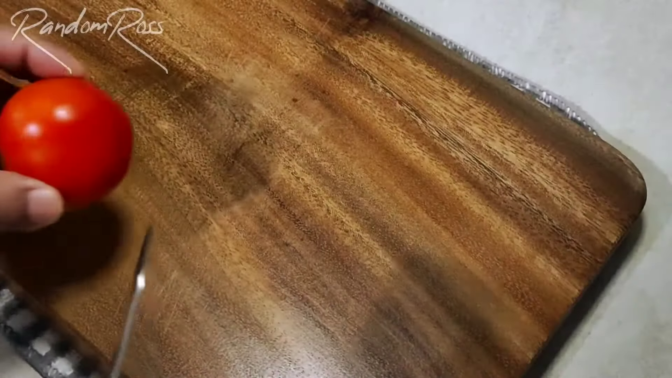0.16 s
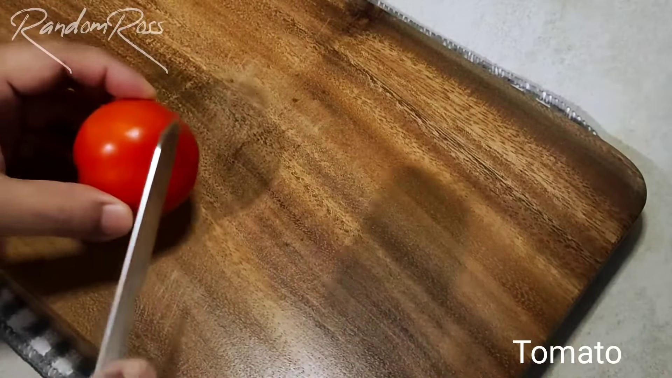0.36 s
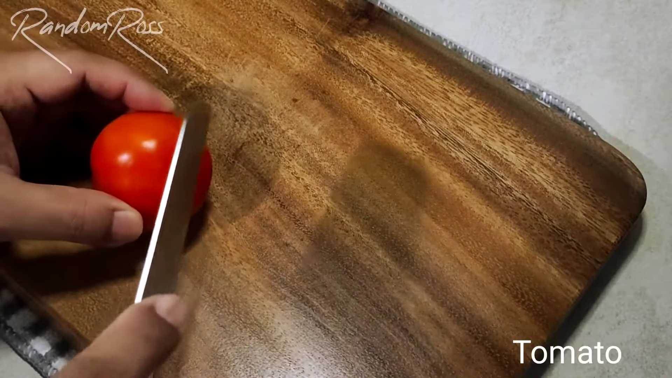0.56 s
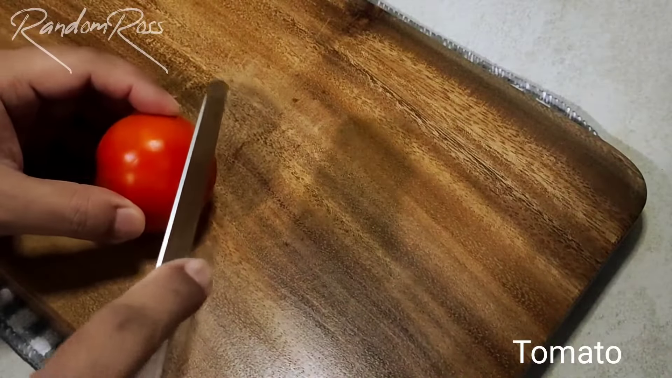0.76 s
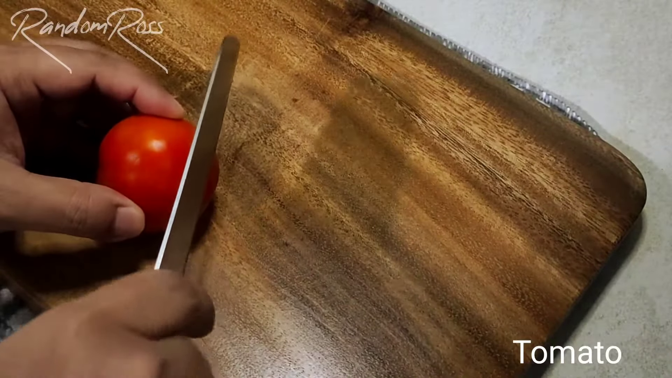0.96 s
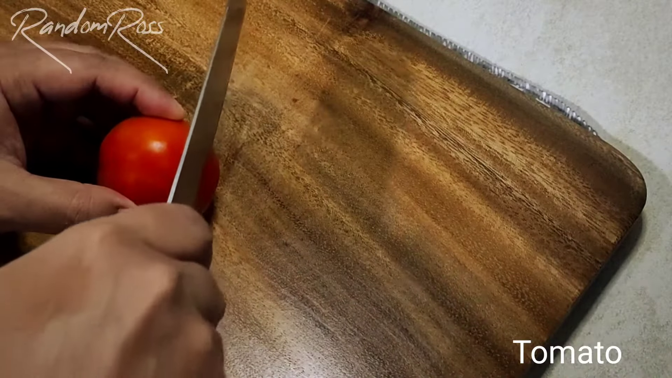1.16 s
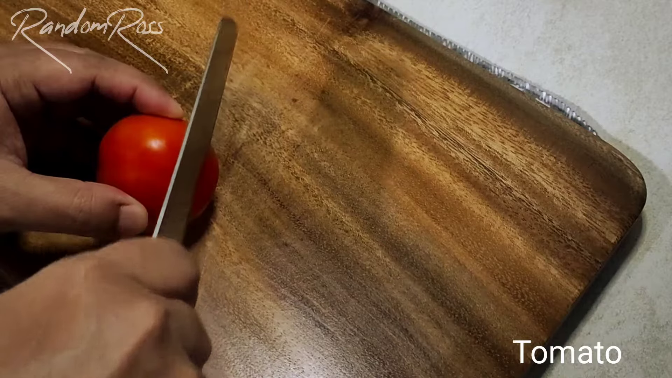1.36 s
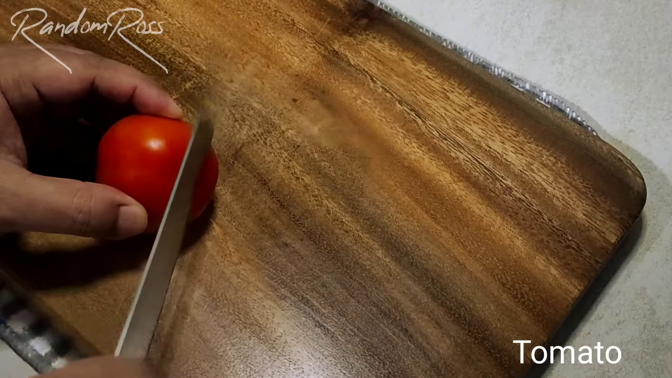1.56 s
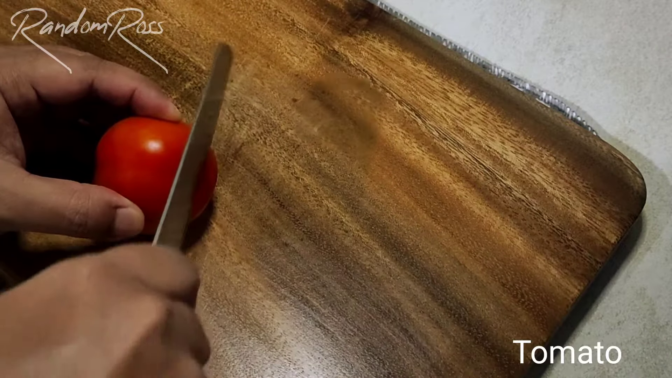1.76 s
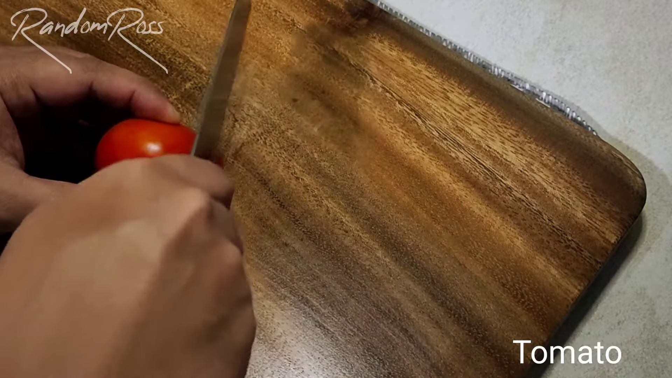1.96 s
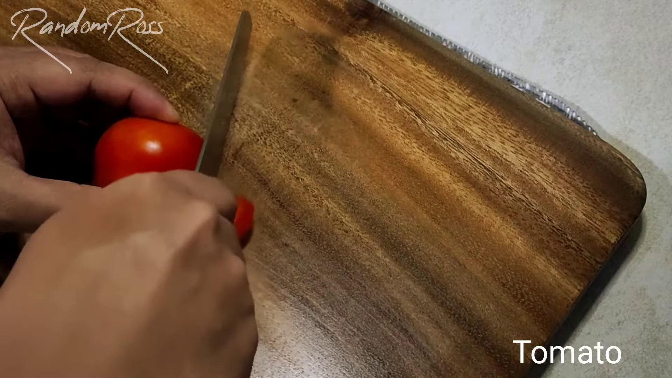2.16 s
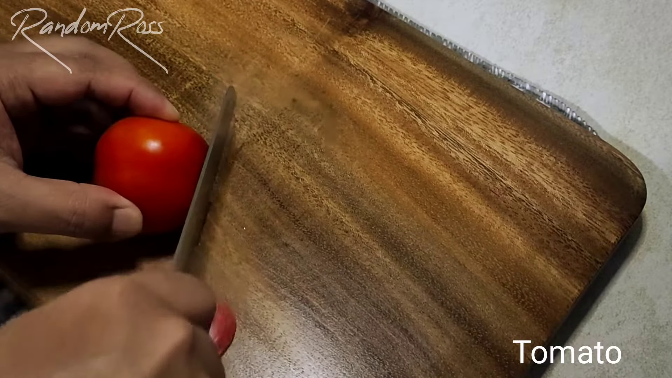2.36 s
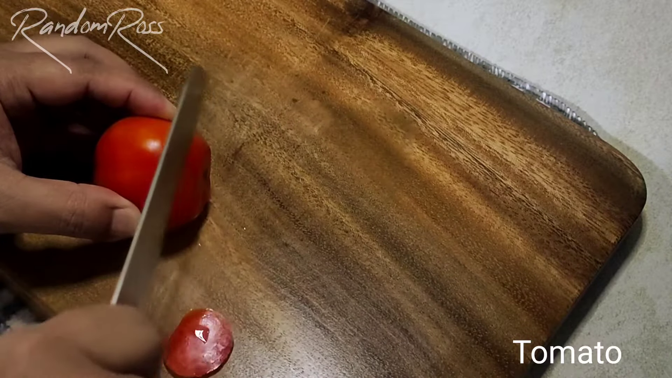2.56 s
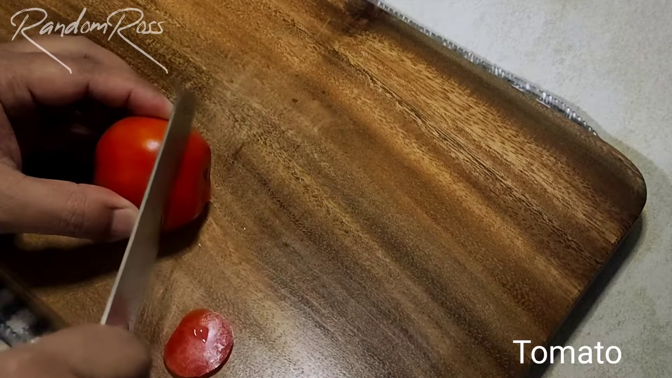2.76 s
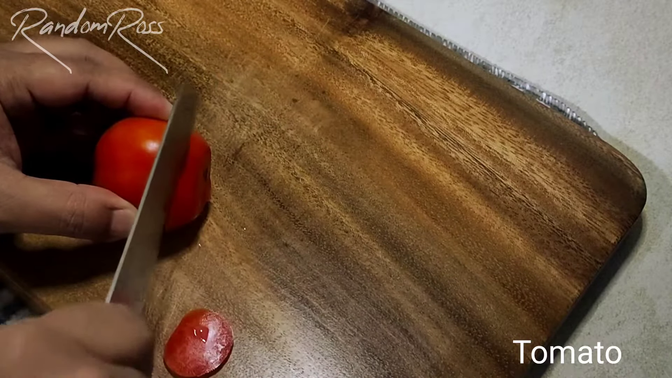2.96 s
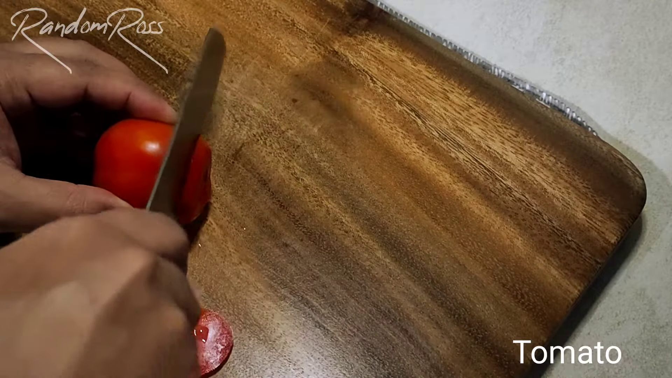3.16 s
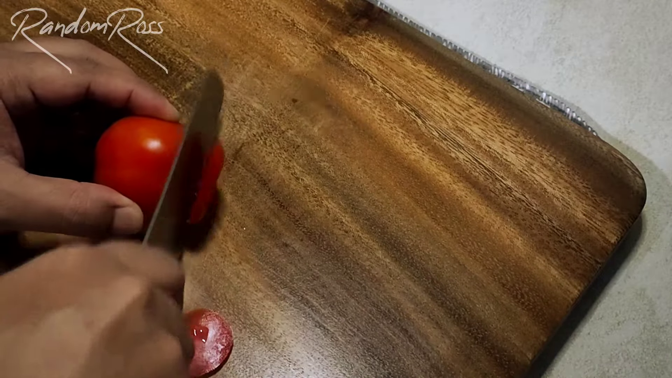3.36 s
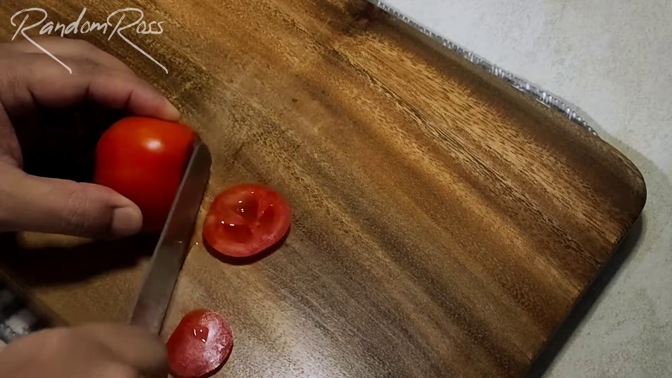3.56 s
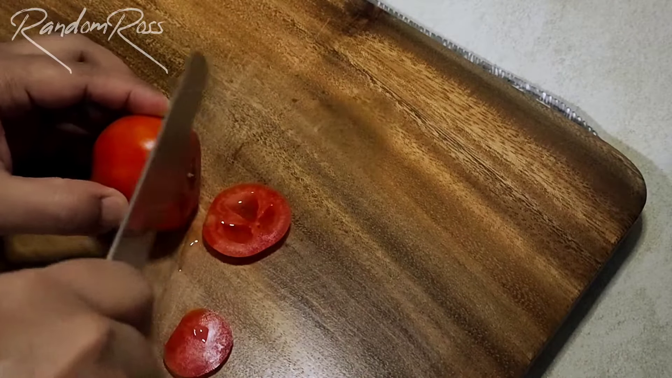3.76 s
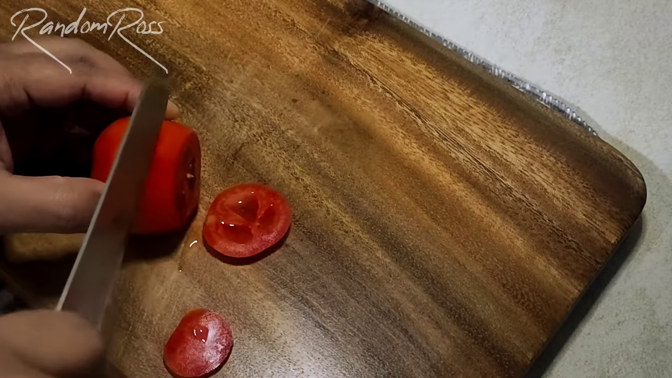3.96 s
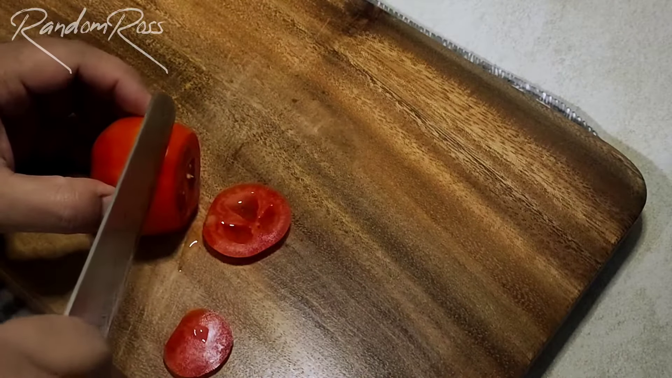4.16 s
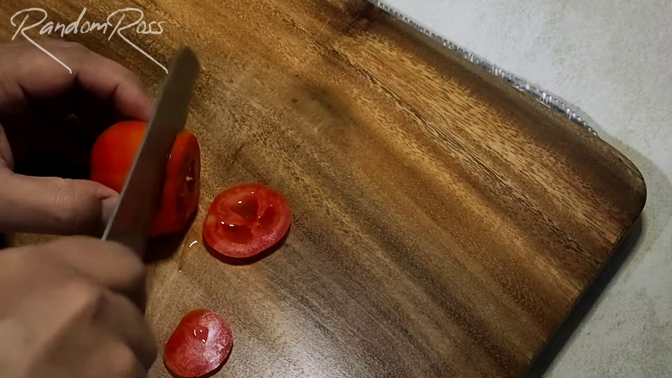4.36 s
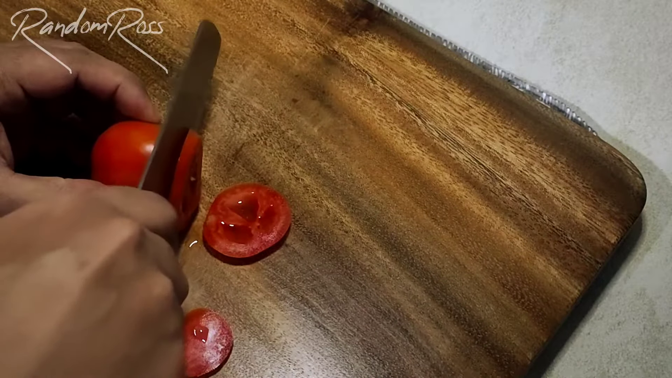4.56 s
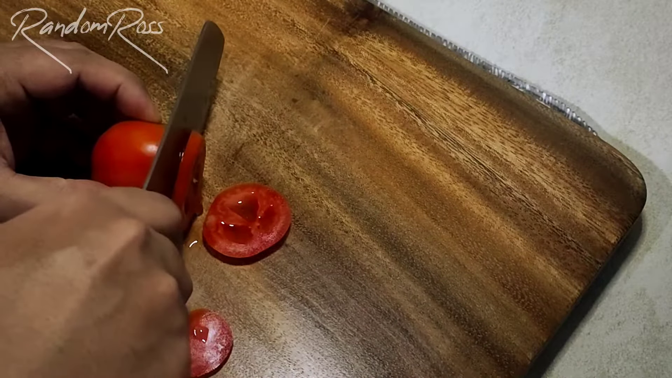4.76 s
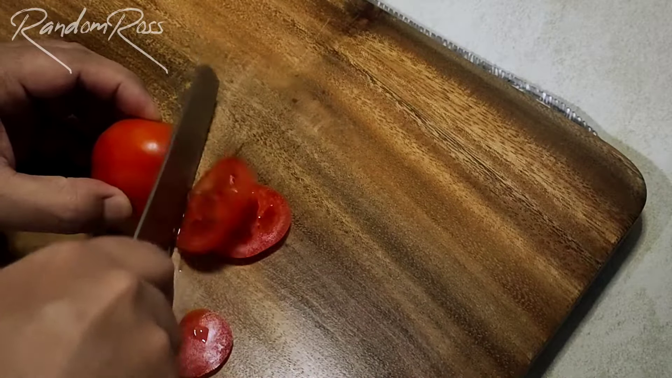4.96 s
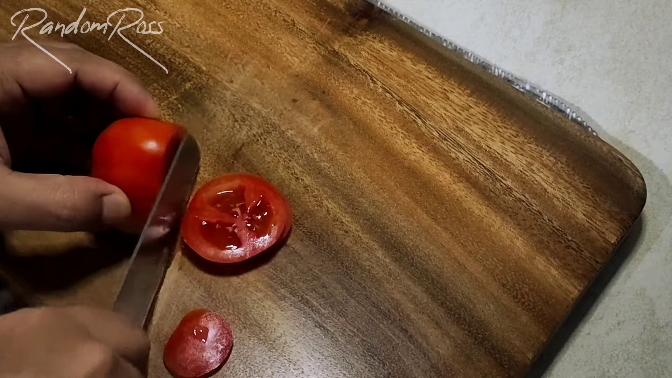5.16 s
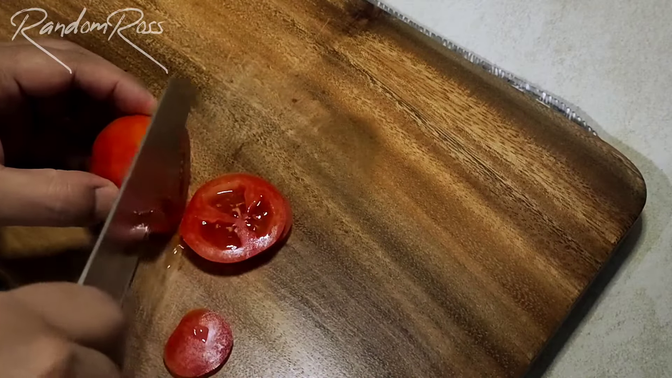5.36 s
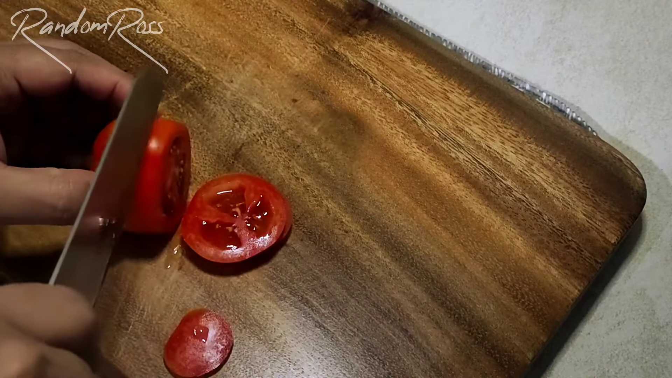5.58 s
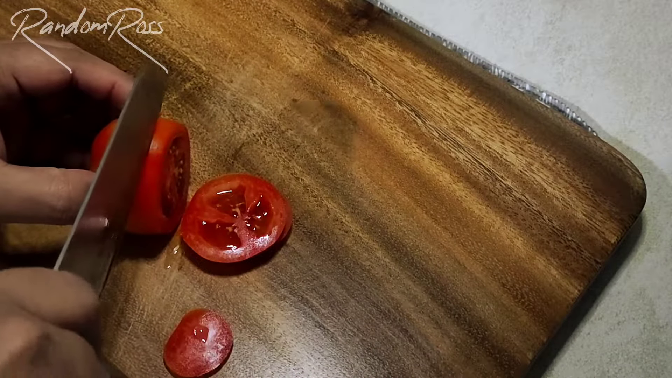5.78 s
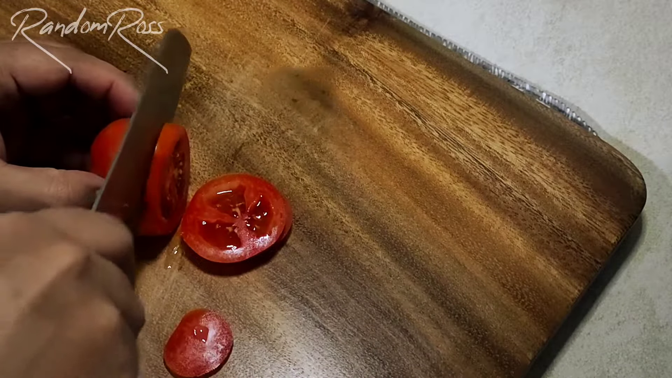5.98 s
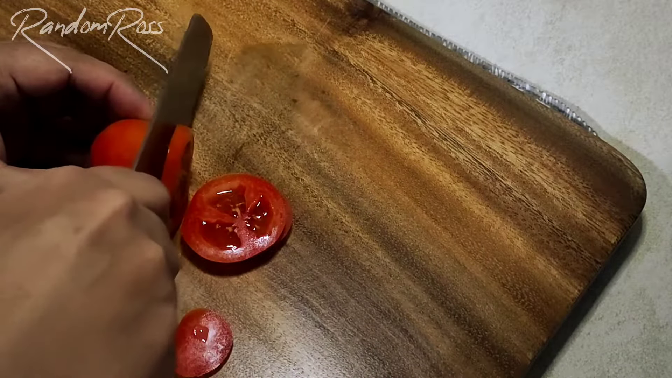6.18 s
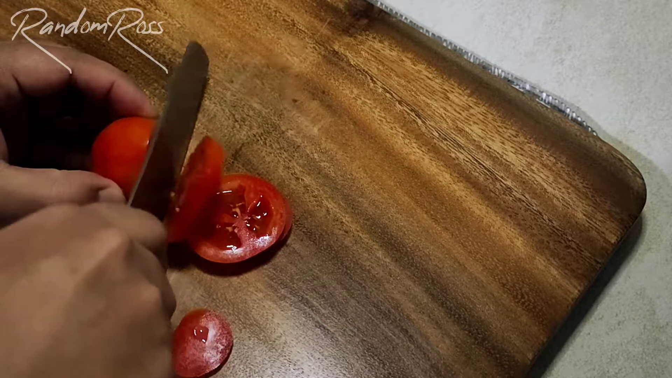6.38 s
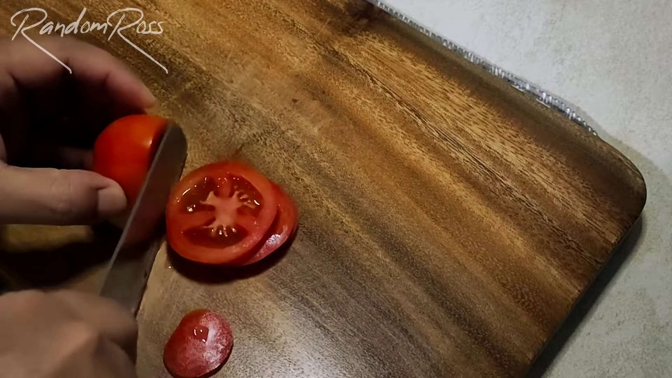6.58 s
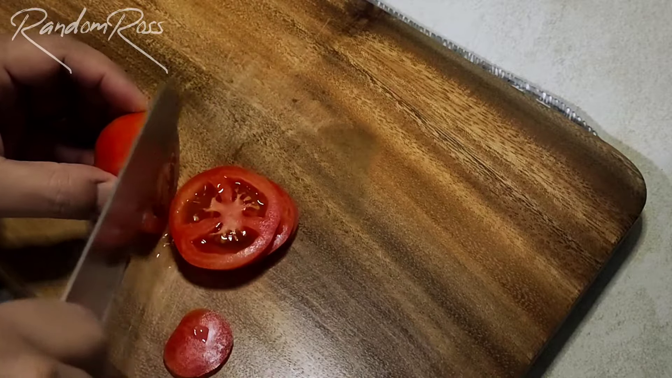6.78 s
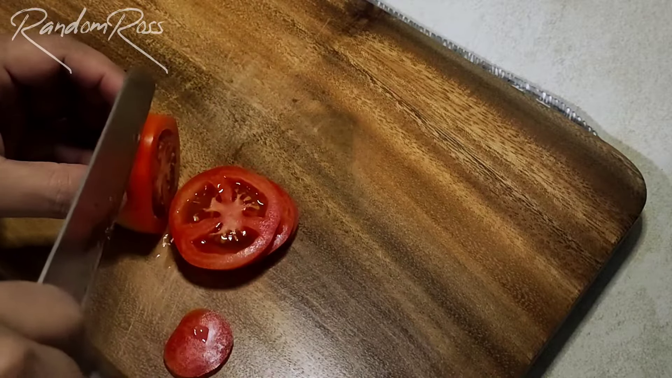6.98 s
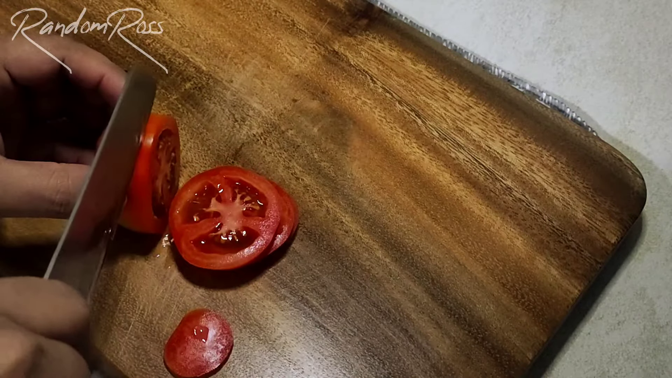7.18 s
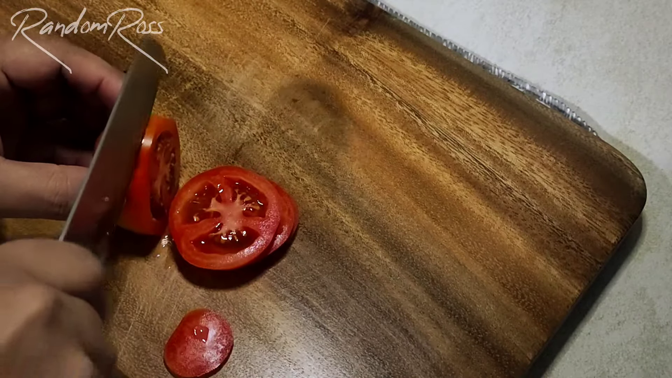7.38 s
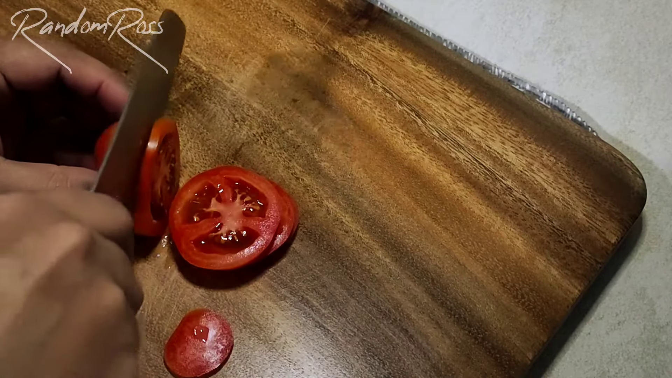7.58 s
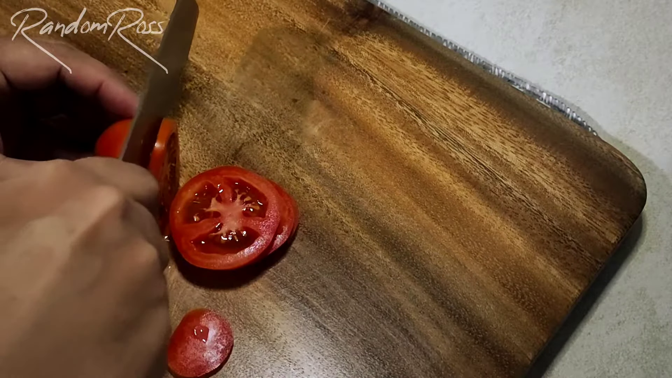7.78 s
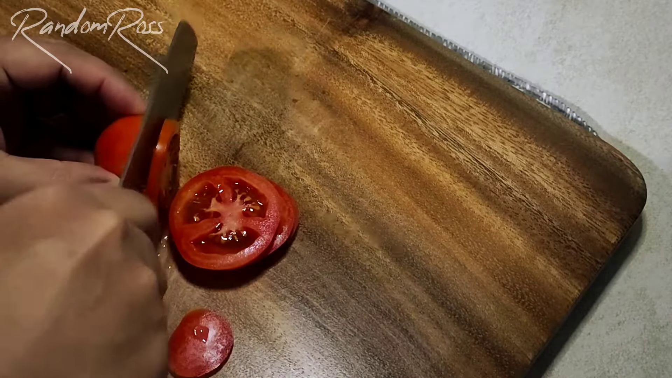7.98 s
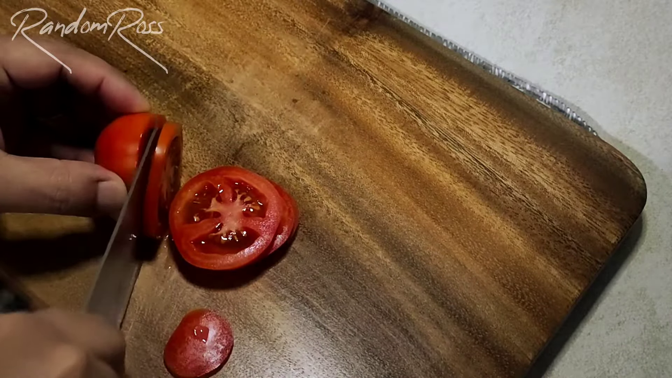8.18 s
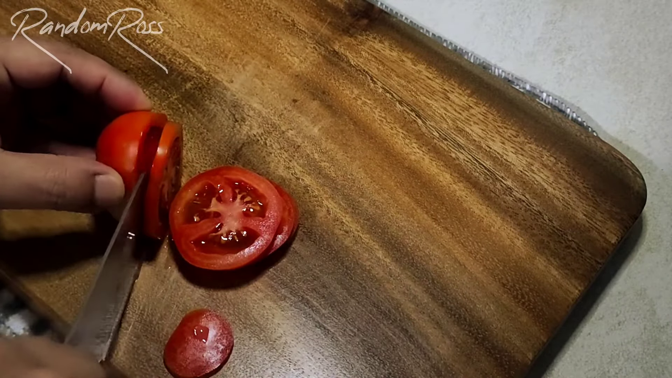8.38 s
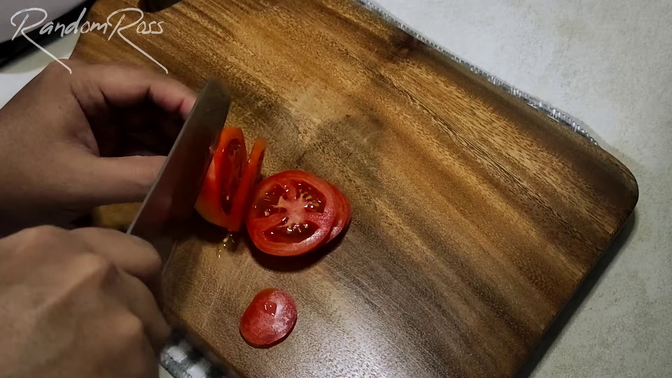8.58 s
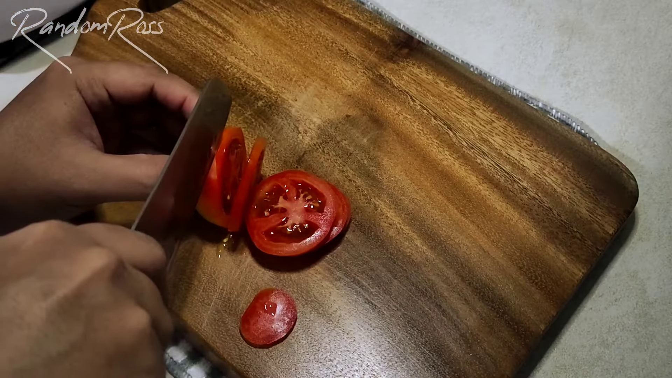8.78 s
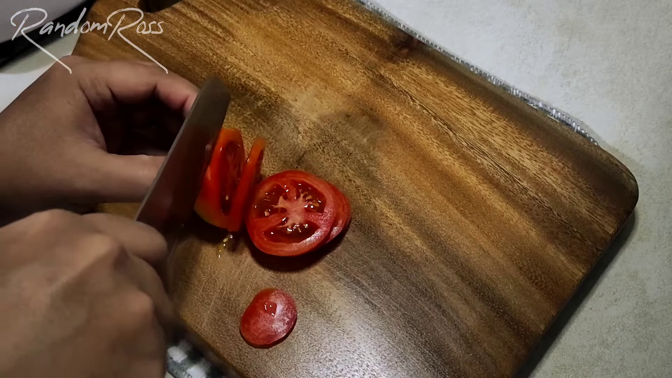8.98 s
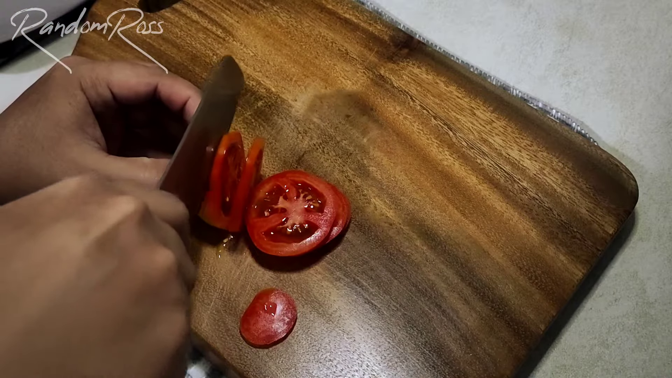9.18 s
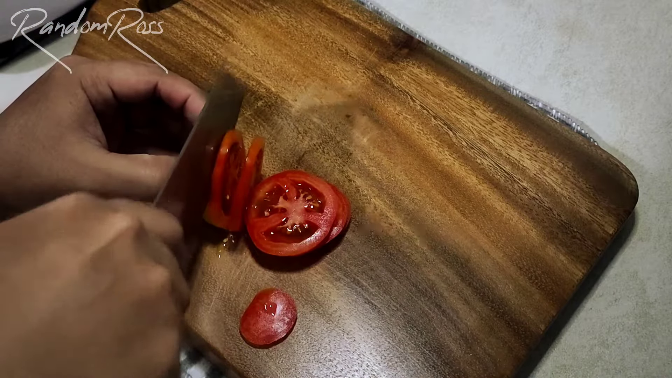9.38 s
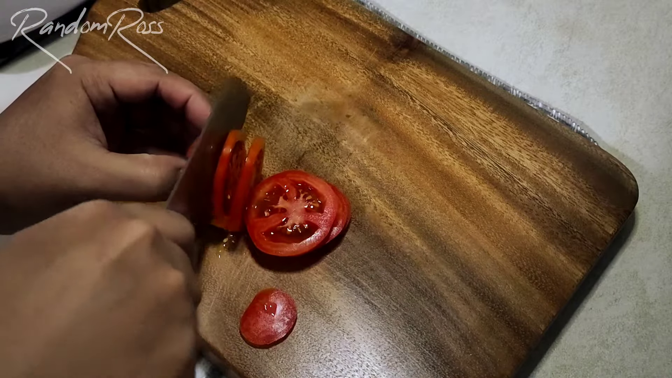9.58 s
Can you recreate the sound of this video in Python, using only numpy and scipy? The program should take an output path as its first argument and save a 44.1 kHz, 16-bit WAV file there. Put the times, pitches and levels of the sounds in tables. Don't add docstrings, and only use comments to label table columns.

```python
import sys
import numpy as np
from scipy import signal
from scipy.fft import rfft, irfft, next_fast_len
from scipy.io import wavfile

SR = 44100
rng = np.random.default_rng(int(sys.argv[2]) if len(sys.argv) > 2 else 0)


def int16_out(signal):
    q = np.round(np.clip(np.atleast_2d(signal).T, -1, 1) * 32767)
    wavfile.write(sys.argv[1], SR, q.astype(np.int16))


def gain_from_decibels(decibels):
    exponent = np.asarray(decibels, float) / 20
    return 10 ** exponent


N = 424683

# start in s, force in dB, contact softness in Hz, tip modes in dB, heel modes in dB.
KNOCK_EVENTS = [
    (2.134, -33, 1500, 10, 0),
    (2.1698, -1.5, 2460, -3, 3),
    (3.5098, -5, 2470, 15.5, -4),
    (5.0495, -10, 1600, 7, 7),
    (5.1, -37, 1500, 23.5, 2),
    (6.4345, -10.5, 620, -12, 6),
    (8.185, -29.5, 480, -10, -10),
]


def rms_one(x):
    return x / np.sqrt(np.mean(x ** 2) + 1e-20)


def at_hz(points, hz):
    table_hz, values = np.array(points).T
    return np.interp(np.log(hz + 1), np.log(table_hz), values)


def drift(rate_hz):
    r = np.exp(-2 * np.pi * rate_hz * 40 / SR)
    noise = rng.standard_normal(N // 40 + 2002)
    slow = signal.lfilter([1], [1, -2 * r, r * r], noise)[2000:]
    return np.interp(np.arange(N) / 40, np.arange(len(slow)), rms_one(slow))


def coloured(spectrum, alike, lag_samples=0.):
    # frequency in Hz, left minus right in dB.
    port_balance = [(60, 2.5), (110, 0.5), (200, 0), (380, -1.5), (700, 0.5), (1290, -1.5), (2380, 0),
                    (4400, 0.5), (8120, -7.5), (15000, 17)]
    size = next_fast_len(N)
    hz = np.fft.rfftfreq(size, 1 / SR)
    shared, opposed = rfft(rng.standard_normal((2, size)))
    alike = np.clip(at_hz(alike, hz), -1, 1)
    pair = np.sqrt(1 + alike) * shared + np.sqrt(1 - alike) * opposed * [[1], [-1]]
    pair[0] *= np.exp(-2j * np.pi * hz * lag_samples / SR)
    port_gain = gain_from_decibels(at_hz(port_balance, hz) * [[.5], [-.5]])
    return rms_one(irfft(pair * port_gain * gain_from_decibels(at_hz(spectrum, hz)), size)[:, :N])


def ringing(modes, t):
    hz, t60_s, left, right = np.transpose(modes)[:, :, None]
    waves = np.sin(2 * np.pi * hz * t) * gain_from_decibels(-60 * t / t60_s)
    return np.array([(left * waves).sum(axis=0), (right * waves).sum(axis=0)])


def resonance(push, hz, width_hz):
    r = np.exp(-np.pi * width_hz / SR)
    poles = [1, -2 * r * np.cos(2 * np.pi * hz / SR), r * r]
    return np.sqrt(1 - r * r) * signal.lfilter([1, 0, -1], poles, push)


def add(out, start_s, sound):
    i = round(start_s * SR)
    out[:, i:i + sound.shape[1]] += sound[:, :N - i]


def air():
    # time in s, level in dB.
    rumble_swell = [(0.0, -60.5), (0.56, -61), (3.57, -59), (3.94, -61), (4.4, -59.5), (5.63, -60.5),
                    (8.31, -58), (8.56, -58.5), (9.63, -54)]
    # frequency in Hz, density in dB per Hz.
    low_spectrum = [(12, -82), (20, -59), (32, -65), (43, -11), (118, 1.5), (200, -7), (221, -24.5),
                    (256, -13.5), (300, -4.5), (390, -45), (660, -120)]
    mid_spectrum = [(120, -38), (200, -11), (227, -0.5), (257, -2.5), (308, -3.5), (382, -1.5), (524, -0.5),
                    (614, -6.5), (843, -9), (1160, -11.5), (1250, -12), (1470, -12), (3000, -24),
                    (3900, -62), (6600, -120)]
    high_spectrum = [(1290, -46), (2200, -4), (3190, -0.5), (4150, 2), (4700, -3), (6540, -0.5),
                     (7160, -6.5), (9020, 2.5), (10600, -2.5), (11200, -2.5), (13300, -8), (15200, -14),
                     (15800, -10)]
    # frequency in Hz, left-right likeness of the room air.
    likeness = [(60, 1), (130, 0.93), (290, 0.82), (640, 0.36), (1410, 0), (3100, -0.0), (6820, 0.27),
                (15000, 0.68)]
    # frequency in Hz, level in dB, wander in Hz.
    whine_partials = [(1286, -74, 1.57), (1225, -81, 2.92)]
    mid_db, high_db, whine_sway_db = -62, -69.5, .8

    t = np.arange(N) / SR
    rumble_db = np.interp(t, *np.transpose(rumble_swell)) + 0.67 * drift(7.8)
    rumble = gain_from_decibels(rumble_db) * coloured(low_spectrum, likeness, lag_samples=7.5)
    mid = gain_from_decibels(mid_db + .5 * drift(3.3)) * coloured(mid_spectrum, likeness, lag_samples=6.5)
    mic_hiss = gain_from_decibels(high_db) * coloured(high_spectrum, likeness)
    whine = 0
    for hz, level_db, wander_hz in whine_partials:
        phase = 2 * np.pi * np.cumsum(hz + wander_hz * drift(3.98)) / SR
        whine = whine + gain_from_decibels(level_db + 3.5 + whine_sway_db * drift(3.3)) * np.sin(phase + [[0], [1.3]])
    return rumble + mid + mic_hiss + whine


def squeaks():
    # start in s, length in s, frequency in Hz, level in dB.
    chirps = [
        (1.135, .055, 13500, -69),
        (5.136, 0.041, 4250, -64),
        (9.492, .025, 3600, -69),
        (9.532, .014, 3000, -65),
        (9.234, 0.041, 1490, -59.5),
        (9.55, .035, 1980, -67),
        (9.58, .03, 1720, -75),
    ]
    out = np.zeros((2, N))
    for start_s, length_s, hz, level_db in chirps:
        t = np.arange(round(length_s * SR)) / SR
        swell = np.sqrt(np.sin(np.pi * t / length_s))
        add(out, start_s, gain_from_decibels(level_db) * swell * np.sin(2 * np.pi * hz * t + [[0], [1]]))
    return out


def blade_levels():
    # start in s, length in s, hiss at start in dB, hiss at end in dB,
    # drag relative to hiss in dB.
    strokes = [(1.40, 0.17, -74, -65.5, -18), (1.745, 0.36, -71, -59.5, -14),
               (2.25, 0.074, -60, -53.5, -7.5), (2.349, 0.061, -49, -51.5, -11.5),
               (3.045, 0.28, -66.5, -59.5, -9.5), (4.337, 0.33, -62.5, -61, -11.5),
               (4.65, 0.19, -62, -74, -14), (5.091, .08, -54.5, -58.5, -2.5), (5.184, 0.07, -58, -52, -7),
               (5.82, 0.15, -72, -68, -7), (5.984, 0.27, -61.5, -62, -8), (6.415, 0.085, -59.5, -60, -5.5),
               (6.5, 0.22, -57, -58, -5), (7.36, 0.26, -72.5, -62.5, -23),
               (7.588, 0.37, -70.5, -62.5, -4.5), (8.04, .17, -69, -59.5, -6),
               (8.223, 0.22, -58, -69, -2.5), (9.094, .25, -70, -63.5, -3), (9.437, 0.25, -69.5, -60.5, 0)]
    # time in s, peak hiss in dB, swell in dB per s,
    # fade in dB per s, drag afterwards relative to hiss in dB.
    plunges = [
        (2.137, -51, 3000, 801, -1),
        (2.169, -65, 1000, 500, -5),
        (3.511, -51.5, 136, 162, 5.5),
        (3.684, -60.5, 380, 603, -9),
        (5.05, -48.5, 247, 218, -2),
        (6.238, -52.5, 220, 228, -10),
        (8.959, -59, 3000, 300, -12),
    ]
    start_db_per_s, stop_db_per_s = 498, 425
    falling_drag_db = -14

    t = np.arange(0, N + 32, 32) / SR
    s, length_s, first_db, last_db, drag_db = np.transpose(strokes)[:, :, None]
    travel_db = first_db + (last_db - first_db) * np.clip((t - s) / length_s, 0, 1)
    before_db = start_db_per_s * np.maximum(s - t, 0)
    after_db = stop_db_per_s * np.maximum(t - s - length_s, 0)
    steady = travel_db - before_db - after_db

    s, peak_db, swell, fade, stopped_drag_db = np.transpose(plunges)[:, :, None]
    sudden = peak_db - swell * np.maximum(s - t, 0) - fade * np.maximum(t - s, 0)
    sudden_drag = sudden + np.where(t < s, falling_drag_db, stopped_drag_db)

    hiss = np.vstack([steady, sudden])
    drag = np.vstack([steady + drag_db, sudden_drag])
    return [np.interp(np.arange(N) / SR, t, v.max(axis=0)) for v in (hiss, drag)]


def blade(rub):
    # frequency in Hz, width in Hz, level in dB.
    steel_modes = [(2625, 88, -0.5), (4204, 65, -1.5), (4660, 59, 1.5), (5240, 110, -1.5), (5470, 12, 1),
                   (6140, 83, 4)]
    grit_per_s, grit_db = 200, -7
    hits = rng.random(N) < grit_per_s / SR
    snaps = hits * rng.laplace(0, 1, N) * np.sqrt(SR / grit_per_s)
    push = rub + gain_from_decibels(grit_db) * snaps
    out = 0
    for hz, width_hz, level_db in steel_modes:
        out = out + gain_from_decibels(level_db) * resonance(push, hz, width_hz)
    return rms_one(out)


def sawing():
    # frequency in Hz, density in dB per Hz.
    hiss_spectrum = [(2940, -12), (5000, -6.5), (5560, -27), (5950, -6), (6550, -2), (7380, -7.5),
                     (7560, -5.5), (8530, 1.5), (10000, 0.5), (11800, 0), (12800, -3.5), (14200, -12),
                     (15800, -15.5)]
    drag_spectrum = [(410, -4), (700, 6.5), (1260, 0), (2060, -1.5), (2510, -3), (2970, -5), (3290, 2),
                     (5550, -10.5), (6500, -16.5), (8450, -12), (14300, -120)]
    alike = [(700, 0.16), (3000, 0.43), (8000, 0.21), (15000, 0.18)]   # Hz, left-right likeness
    blade_db = -9
    hiss, drag = gain_from_decibels(np.array(blade_levels()))
    flutter = gain_from_decibels(1.2 * drift(20))
    skin = coloured(hiss_spectrum, alike, lag_samples=6.22)
    rub = coloured(drag_spectrum, alike, lag_samples=6.85)
    return flutter * (hiss * skin + drag * (rub + gain_from_decibels(blade_db) * blade(rub)))


def knocks():
    # frequency in Hz, t60 in s, left height, right height.
    board_modes = [(180, 0.14, -0.026, -0.02), (247.5, 0.12, 0.038, 0.0081), (308, 0.057, 0.039, 0.051),
                   (460, 0.012, 0.019, 0.2), (580, 0.023, 0.15, 0.37), (612, 0.054, -0.32, -0.58),
                   (657, 0.081, 0.039, -0.12), (736, 0.076, -0.091, 0.06), (809, 0.17, -0.035, -0.045),
                   (901, 0.075, 0.076, 0.011), (1040, 0.087, -0.019, -0.032), (1238, 0.039, -0.059, 0.029),
                   (1250, 0.19, -0.026, -0.018), (1400, 0.039, 0.035, 0.07), (2310, 0.081, 0.0022, -.008),
                   (3470, 0.025, 0.034, -0.014), (4200, .06, 0.0099, .008)]
    tip_modes = [(1100, 0.015, 0.0042, -0.028), (1600, 0.031, -0.019, -0.026),
                 (1636, 0.11, 0.0041, -0.0097), (2270, 0.033, 0.0024, 0.0038),
                 (2850, 0.037, -0.0011, 0.006), (3684, 0.077, 0.0015, 0.011),
                 (4100, 0.09, -0.0086, -0.00018), (4030, 0.028, 0.0022, 0.01), (4950, .06, 0.0055, -0.0048),
                 (5200, .04, -0.01, -0.0055)]
    heel_modes = [(2586, 0.052, 0.051, -0.0089), (2770, 0.033, -0.018, -0.015), (3280, 0.035, 0.01, 0.011)]
    # start in s, level in dB, low edge in Hz, high edge in Hz, t60 in s.
    cracks = [
        (2.135, -39.5, 3000, 13000, 0.036),
        (2.1703, -44, 5500, 13000, 0.016),
        (2.1704, -33.5, 2000, 4500, 0.028),
        (3.5106, -35, 5000, 11000, 0.035),
        (3.5097, -26, 3320, 4130, 0.054),
        (3.5114, -32, 4900, 5500, 0.036),
        (5.0495, -32.5, 6000, 11000, 0.027),
        (6.4345, -52, 2500, 9000, .03),
    ]
    out = np.zeros((2, N))
    t = np.arange(SR // 2) / SR
    board, tip, heel = ringing(board_modes, t), ringing(tip_modes, t), ringing(heel_modes, t)
    for start_s, force_db, soft_hz, tip_db, heel_db in KNOCK_EVENTS:
        contact = signal.butter(2, soft_hz, fs=SR, output="sos")
        struck = board + gain_from_decibels(tip_db) * tip + gain_from_decibels(heel_db) * heel
        add(out, start_s, gain_from_decibels(force_db) * signal.sosfilt(contact, struck))
    for start_s, crack_db, low_hz, high_hz, t60_s in cracks:
        bright = signal.butter(1, [low_hz, high_hz], "band", fs=SR, output="sos")
        burst = rng.standard_normal((2, len(t))) * gain_from_decibels(-60 * t / t60_s)
        add(out, start_s, gain_from_decibels(crack_db) * signal.sosfilt(bright, burst))
    return out


def flops():
    # start in s, thud in dB, smear in s, splat in dB.
    landings = [
        (2.649, -57, .02, -77),
        (2.659, -37, 0.027, -56),
        (2.72, -50.5, 0.024, -53),
        (2.756, -54.5, 0.028, -78),
        (2.841, -63, 0.05, -83),
        (2.895, -61.5, 0.024, -76),
        (8.194, -56, 0.075, -75),
        (8.959, -65, 0.015, -63),
    ]
    # frequency in Hz, width in Hz, level in dB.
    body_modes = [(184, 110, -26), (344, 84, 4.5), (446, 64, 5.5), (600, 64, -37), (749, 39, -6),
                  (1240, 290, -18), (2850, 4500, -20)]
    settle_lag_s, settle_smear_s = .0095, 0.029
    settle_db, settle_splat_db = -42, -63
    settling = [(start_s + settle_lag_s, force_db + settle_db, settle_smear_s, force_db + settle_splat_db)
                for start_s, force_db, *_ in KNOCK_EVENTS]

    out = np.zeros((2, N))
    t = np.arange(SR // 3) / SR
    bright = signal.butter(2, [5500, 14000], "band", fs=SR, output="sos")
    for start_s, thud_db, smear_s, splat_db in list(landings) + settling:
        shared, left, right = rng.standard_normal((3, len(t))) * np.exp(-t / smear_s)
        push = np.array([shared + 0.71 * left, shared + 1.07 * right])
        thud = 0
        for hz, width_hz, level_db in body_modes:
            thud = thud + gain_from_decibels(level_db) * resonance(push, hz, width_hz)
        splat = signal.sosfilt(bright, push)
        add(out, start_s, gain_from_decibels(thud_db - 11.0) * thud + gain_from_decibels(splat_db) * splat)
    return out


def kitchen(x):
    # frequency in Hz, t60 in s.
    room_t60 = [(150, 0.48), (400, 0.26), (600, 0.41), (900, 0.18), (1500, 0.17), (4000, 0.13),
                (12000, 0.24)]
    # frequency in Hz, level in dB.
    room_share = [(150, -6), (400, -2), (600, -3.5), (900, -6), (1500, 15), (4000, -1), (12000, 3.5)]
    t = np.arange(SR // 2) / SR
    echo = 0
    for low_hz in 90 * 2 ** np.arange(0, 7.5, .5):
        band = signal.butter(2, [low_hz, np.sqrt(2) * low_hz], "band", fs=SR, output="sos")
        fall_db = at_hz(room_share, 1.24 * low_hz) - 60 * t / at_hz(room_t60, 1.28 * low_hz)
        echo = echo + signal.sosfilt(band, rng.standard_normal((2, len(t)))) * gain_from_decibels(fall_db)
    echo = echo * np.clip((t - .006) / 0.004, 0, 1)
    unit_echo = echo / np.sqrt(np.sum(echo ** 2) / 2)
    return signal.fftconvolve(x, unit_echo, axes=1)[:, :N]


def bumps():
    # start in s, level in dB.
    pushes = [
        (2.173, -45),
        (3.513, -45),
        (5.057, -50),
        (6.437, -61),
        (8.192, -44.5),
        (8.325, -56),
    ]
    bump_hz, bump_t60_s = 146, 0.15
    out = np.zeros((2, N))
    t = np.arange(SR // 5) / SR
    swing = ringing([(bump_hz, bump_t60_s, 1, 1)], t) * np.clip(t / .004, 0, 1)
    for start_s, level_db in pushes:
        add(out, start_s, gain_from_decibels(level_db) * swing)
    return out


def scene():
    room_db = -13.5
    blows = knocks() + flops()
    return blows + gain_from_decibels(room_db) * kitchen(blows) + sawing() + squeaks() + bumps() + air()


def band_limit(x):
    return signal.sosfilt(signal.butter(12, 16490, fs=SR, output="sos"), x)


def record(dry):
    bass_cut = signal.butter(3, 45, "high", fs=SR, output="sos")
    top_cut = signal.cheby2(16, 45, 16050, fs=SR, output="sos")
    mix = signal.sosfilt(top_cut, signal.sosfilt(bass_cut, dry))
    return band_limit(mix)


dry = scene()
out = record(dry)
int16_out(out)
```